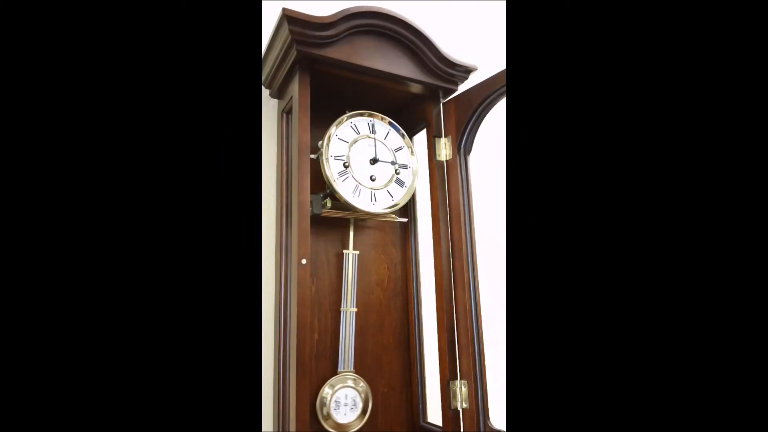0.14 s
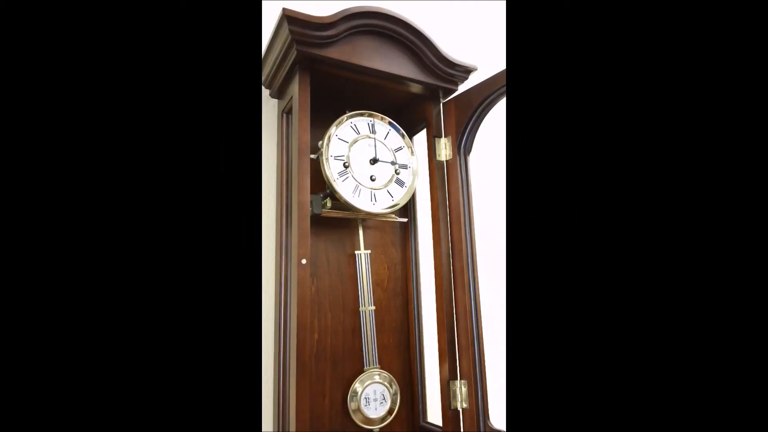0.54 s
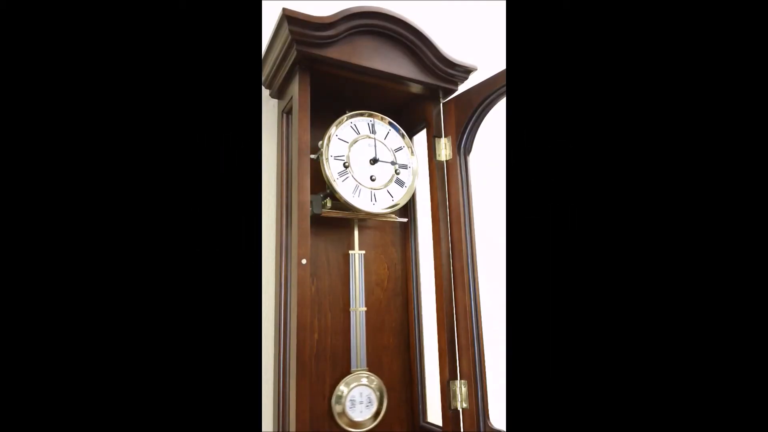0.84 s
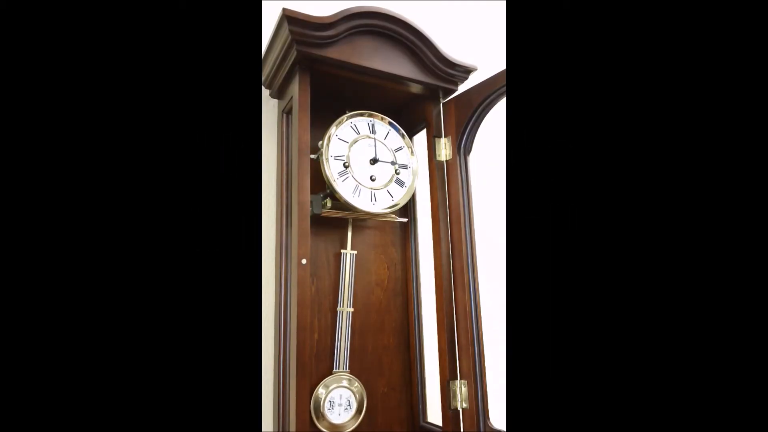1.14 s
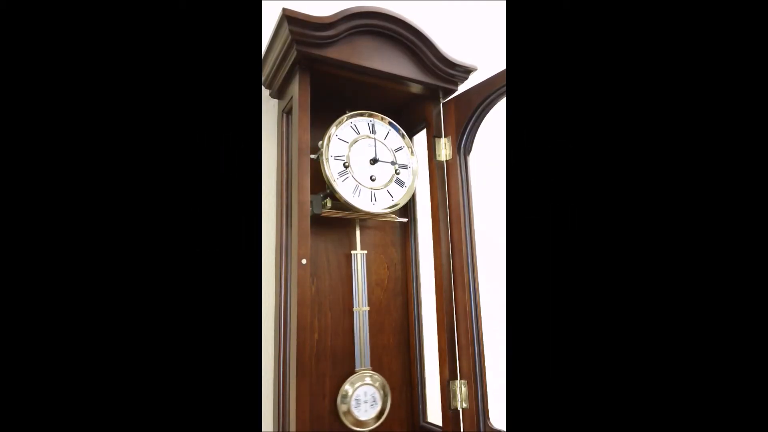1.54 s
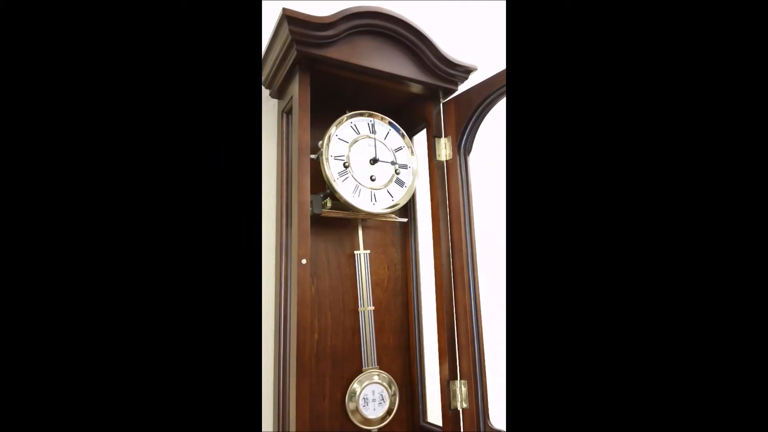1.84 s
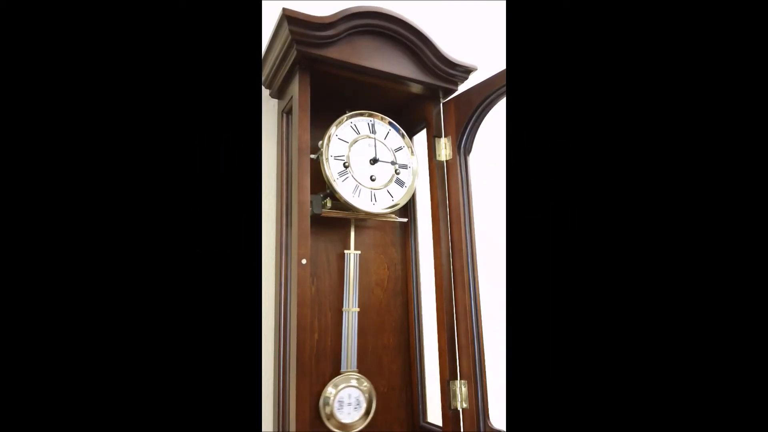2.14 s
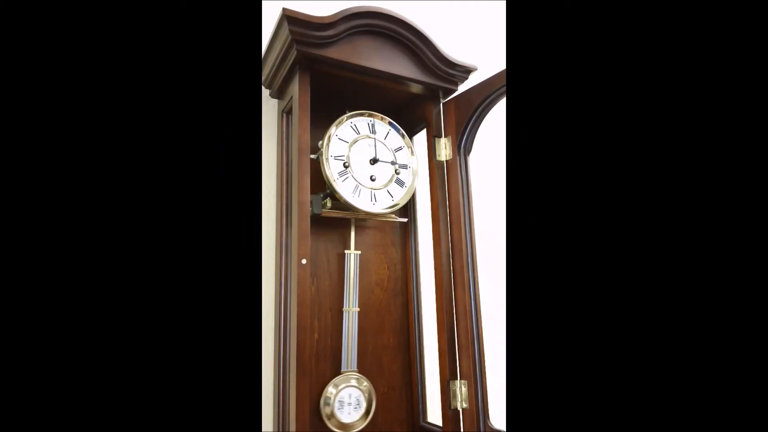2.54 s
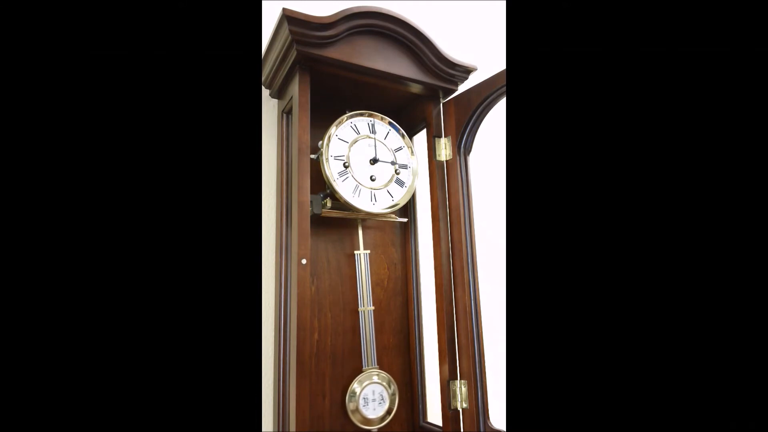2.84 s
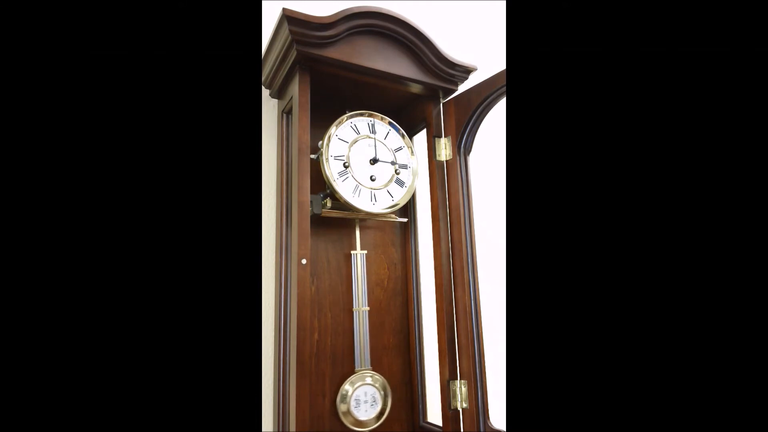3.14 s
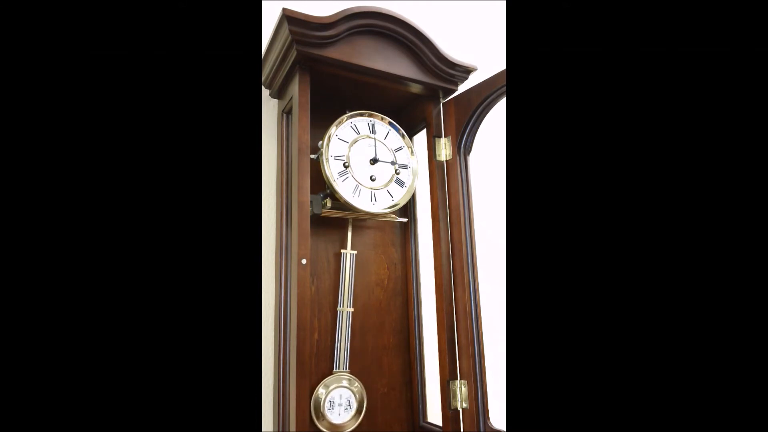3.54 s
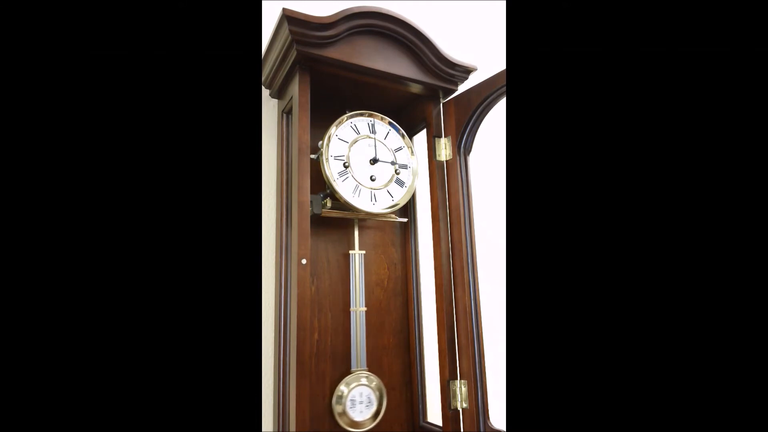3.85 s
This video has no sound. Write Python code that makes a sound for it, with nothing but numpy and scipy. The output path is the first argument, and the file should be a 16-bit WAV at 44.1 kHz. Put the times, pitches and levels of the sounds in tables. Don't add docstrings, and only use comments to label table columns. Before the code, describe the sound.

A pendulum wall clock ticks faintly and steadily, then its mechanism drops with one loud clunk.

```python
import sys
import numpy as np
from scipy import signal
from scipy.fft import rfft, irfft, next_fast_len
from scipy.io import wavfile
from scipy.ndimage import map_coordinates

SR = 44100
rng = np.random.default_rng(int(sys.argv[2]) if len(sys.argv) > 2 else 0)


def transcribe(u):
    v = np.clip(np.atleast_2d(u).T, -1, 1)
    q = np.round(v * 32767).astype(np.int16)
    wavfile.write(sys.argv[1], SR, q)


def gain_from_decibels(decibels):
    exponent = np.asarray(decibels, float) / 20
    return 10 ** exponent


N = 176400


def unit(x):
    return x / np.sqrt(np.mean(x ** 2) + 1e-20)


def curves(rows):
    s, *cols = np.transpose(rows)
    return [np.interp(np.arange(N) / SR, s, c) for c in cols]


def filtered(x, points):
    m = next_fast_len(N + 8192)
    hz, db = np.transpose(points)
    bins_hz = np.fft.rfftfreq(m, 1 / SR)
    curve_db = np.interp(np.log(bins_hz + 1), np.log(hz + 1), db)
    return irfft(rfft(x, m) * gain_from_decibels(curve_db), m)[..., :N]


def coloured_noise(points):
    return unit(filtered(rng.standard_normal(N), points))


def narrow(hz, width_hz, steady=2.5):
    knots = rng.standard_normal((2, 400))
    a, b = (map_coordinates(k, [np.arange(N) * width_hz / SR]) for k in knots)
    carrier = np.exp(2j * np.pi * np.cumsum(hz * np.ones(N)) / SR)
    return unit(np.real((a + 1j * b + steady) * carrier))


def add(out, s, modes, db, rise_s, crack_db=-99, band_hz=(3500, 11500)):
    scatter_db, crack_t60 = 1, 0.028
    t = np.arange(SR // 3) / SR
    ring = np.zeros(len(t))
    for hz, level, t60 in modes:
        fresh_db = level + rng.normal(0, scatter_db)
        ring += gain_from_decibels(fresh_db - 60 * t / t60) * np.sin(2 * np.pi * hz * t)
    band = signal.butter(2, band_hz, "band", fs=SR)
    grit = signal.lfilter(*band, rng.standard_normal(len(t)))
    contact = ring + gain_from_decibels(crack_db - 60 * t / crack_t60) * grit
    out[round(s * SR):][:len(t)] += gain_from_decibels(db) * contact * (1 - np.exp(-t / rise_s))


def recorder_gain():
    # time in seconds, hiss level in dB.
    gain_rise = [(0.0, -67.5), (0.34, -66.5), (0.6, -64), (0.87, -62.5), (3.39, -56), (3.51, -55.5),
                 (3.81, -56), (4.0, -53.5)]
    return gain_from_decibels(curves(gain_rise)[0])


def room_air():
    # frequency in Hz, density in dB per Hz.
    air_colour = [(12, -50), (20, -47), (38, -15), (119, -1), (163, -7.5), (353, -11), (555, -15),
                  (705, -15.5), (11500, -32.5), (15000, -47), (22000, -120)]
    # frequency in Hz, density in dB per Hz.
    apart_colour = [(20, -11), (134, -13), (250, -4), (900, -4.5), (2000, -7.5), (5000, -6), (11500, -8.5),
                    (15000, -23), (22000, -120)]
    air = coloured_noise(air_colour[:-2])
    apart = coloured_noise(apart_colour[:-2])
    return gain_from_decibels(7) * air + gain_from_decibels(-8.5) * apart * np.array([[1], [-1]])


def mains_hum():
    # frequency in Hz, level in dB over the hiss, width in Hz.
    hum_lines = [(242.2, -6.5, 6.03), (301.5, -8, 40), (338.4, -7.5, 33), (357, -5.5, 6.09),
                 (722, -14.5, 3.12)]
    return sum(gain_from_decibels(db) * narrow(hz, width_hz) for hz, db, width_hz in hum_lines)


def engine_drone():
    # time in seconds, low drone level in dB, upper drone level in dB.
    drone_levels = [(0.0, -63, -67), (0.49, -69, -68), (0.69, -74, -62), (1.25, -62, -56), (1.71, -61, -55),
                    (1.87, -58.5, -57.5), (2.24, -61, -59), (2.67, -54, -61.5), (2.95, -61.5, -55),
                    (3.25, -64, -59), (3.6, -72, -64), (4.0, -69, -71)]
    # time in seconds, upper drone frequency in Hz.
    drone_pitch = [(0, 109.6), (.6, 133.7), (1.9, 134.4), (2.3, 120), (3, 116.2), (4, 111.3)]
    low_db, upper_db = curves(drone_levels)
    low = narrow(53.6, 3)
    upper = narrow(curves(drone_pitch)[0], 17, steady=1.0)
    return gain_from_decibels(low_db) * low + gain_from_decibels(upper_db) * upper


def handling_knocks():
    # start in seconds, level in dB, frequency in Hz.
    bumps = [
        (.068, -43, 241),
        (.1, -56, 490),
        (.99, -49, 561),
        (1.262, -43, 282),
    ]
    out = np.zeros(N + SR)
    for s, db, hz in bumps:
        add(out, s, [(hz, 0, 0.081)], db, 0.004)
    return out[:N]


def thumb_scuff():
    # frequency in Hz, density in dB per Hz.
    scuff_colour = [(150, -26), (300, 2), (600, 2), (1000, -16), (2000, -37)]
    start_s, t60, level_db = 0.075, 0.79, -57.5
    t = np.arange(N) / SR
    fade = (t > start_s) * gain_from_decibels(level_db - 60 * abs(t - start_s) / t60)
    return fade * coloured_noise(scuff_colour)


def cloth_rustle():
    # start in seconds, length in seconds, level in dB.
    swishes = [
        (.37, 0.17, -67),
        (0.486, 0.1, -70.5),
        (0.718, .12, -62.5),
        (1.075, 0.057, -62),
        (3.75, .25, -57),
    ]
    # frequency in Hz, density in dB per Hz.
    cloth_colour = [(300, -26), (1200, 2.5), (3000, 2.5), (7000, -4.5), (11000, -18), (14000, -30)]
    t = np.arange(N) / SR
    strokes = np.zeros(N)
    for s, length_s, db in swishes:
        rise = np.clip((t - s) / 0.012, 0, 1)
        fall = np.clip((s + length_s - t) / 0.055 + 1, 0, 1)
        strokes += gain_from_decibels(db) * rise * fall
    return strokes * coloured_noise(cloth_colour)


def wheel_patter():
    # time in seconds, level in dB.
    taps = [(0.445, -51.5), (0.498, -48), (0.553, -49), (0.607, -48), (0.665, -49.5), (1.154, -51),
            (1.207, -47.5), (1.266, -53), (1.427, -50), (1.481, -49.5), (1.534, -46), (1.646, -46.5),
            (1.708, -45), (1.76, -46), (1.815, -45.5), (2.322, -48), (2.376, -43.5), (2.435, -45),
            (2.909, -52), (3.058, -41), (3.114, -56), (3.624, -44.5), (3.794, -42), (3.879, -42.5)]
    # frequency in Hz, level in dB, decay time t60 in seconds.
    tooth = [(917, 1, 0.015), (1190, -4, 0.013), (1580, -4, .012)]
    out = np.zeros(N + SR)
    for s, db in taps:
        add(out, s, tooth, db + 5, 0.0012)
    return out[:N]


def escapement_ticks():
    # time in seconds, case level in dB, then panel, plate and pallet levels in dB over the case.
    ticks = [(.398, -50.5, -8, -17, -9), (.988, -47.5, -8, -7, -5), (1.581, -44.5, -8, -16, -8.5),
             (2.166, -42.5, -5, -7, -6.5), (2.761, -38, -11.5, -16, -12.5), (3.342, -38.5, -6.5, -7, -8),
             (3.933, -36.5, -7, -11, -11)]
    # frequency in Hz, level in dB, t60 in seconds.
    case = [(923, 2, 0.028), (1080, -8, 0.032)]
    tick_panel = [(1300, -3, .018), (1540, 2, .028), (1950, -3, .022), (2250, -5, .018)]
    plate = [(2680, 3, .028)]
    pallet = [(5200, -10, .015), (7600, -1, .03), (14800, -4, .015)]
    crack_band = [1000, 14000]
    lock_s = 0.005
    out = np.zeros(N + SR)
    for s, db, panel_db, plate_db, pallet_db in ticks:
        add(out, s - 0.001, case, db + 9, 0.004)
        add(out, s - lock_s / 2, tick_panel, db + panel_db, 0.001)
        add(out, s - 0.003, plate, db + plate_db, 0.001)
        add(out, s - lock_s, pallet, db + pallet_db, 0.002, crack_db=8, band_hz=crack_band)
    return out[:N]


def lever_clunk():
    # time in seconds, case boom level in dB, panel level in dB, steel level in dB.
    contacts = [
        (3.3864, -44, -25, -32.5),
        (3.3879, -38, -17.5, -26.5),
        (3.3955, -44, -30, -27),
        (3.398, -19.5, -33.5, -27.5),
        (3.4145, -50, -48, -32.5),
        (3.425, -42, -56, -37),
        (3.4317, -52, -56, -45),
    ]
    # frequency in Hz, level in dB, t60 in seconds.
    boom_modes = [(430, -19, .07), (510, -20, .12), (637, -17, 0.13), (864, -14, 0.21), (958, -14, .07),
                  (990, 0, .11), (1060, -17, 0.35), (1173, -19, .2), (1300, -22, .1)]
    panel_modes = [(980, 2, .022), (1296, -8, 0.022), (1444, -4, 0.038), (1500, -2, 0.029),
                   (1687, -19, .12), (1880, -21, 0.085), (2355, -14.5, 0.055), (2650, -10.5, 0.042),
                   (2670, -2.5, 0.024), (2743, -5, .04), (3100, -21, 0.019)]
    steel_modes = [(4334, -11, 0.038), (5700, -10, .03), (6230, -16, 0.05), (7010, -21, 0.03),
                   (7800, -10, 0.026), (7940, -11.5, 0.042), (8800, -13.5, 0.038), (9383, -18, 0.053),
                   (10630, -13, 0.031), (11500, -3, 0.036)]
    spring_modes = [(14000, -27, .05), (14490, -44, 0.38), (11950, -58, .5)]
    out, boom = np.zeros((2, N + SR))
    for s, boom_db, panel_db, steel_db in contacts:
        add(boom, s, boom_modes, boom_db, 0.002)
        add(out, s, panel_modes, panel_db, 0.0006)
        add(out, s, steel_modes, steel_db, 0.0004, crack_db=2.5)
    add(out, contacts[1][0], spring_modes, 0, 0.001)
    rest_s, rest_db = 3.436, -7
    resting = np.clip((np.arange(N) / SR - rest_s) / 0.0036, 0, 1)
    return out[:N] + boom[:N] * gain_from_decibels(rest_db * resting)


def room(x):
    t60, level_db, top_hz = 0.36, -27, 2500
    t = np.arange(SR // 2) / SR
    dull = signal.lfilter(*signal.butter(1, top_hz, fs=SR), rng.standard_normal(len(t)))
    tail = dull * gain_from_decibels(-60 * t / t60) * np.clip(t / 0.0082, 0, 1)
    return gain_from_decibels(level_db) * signal.fftconvolve(x, tail / np.linalg.norm(tail))[:N]


def scene():
    background = recorder_gain() * (room_air() + mains_hum()) + engine_drone()
    handling = handling_knocks() + thumb_scuff() + cloth_rustle()
    clock = wheel_patter() + escapement_ticks() + lever_clunk()
    return background + handling + clock + room(clock)


def roll_off(x):
    return signal.sosfilt(signal.butter(12, 16480, fs=SR, output="sos"), x)


def record(dry):
    # frequency in Hz, response in dB.
    mic_response = [(10500, 0.5), (12000, -12), (12400, -35), (12950, -36), (13200, -6), (14200, -4.5),
                    (15250, -0.5), (15600, -36), (16500, -60)]
    mix = filtered(dry, mic_response)
    return roll_off(mix)


dry = scene()
out = record(dry)
transcribe(out)
```